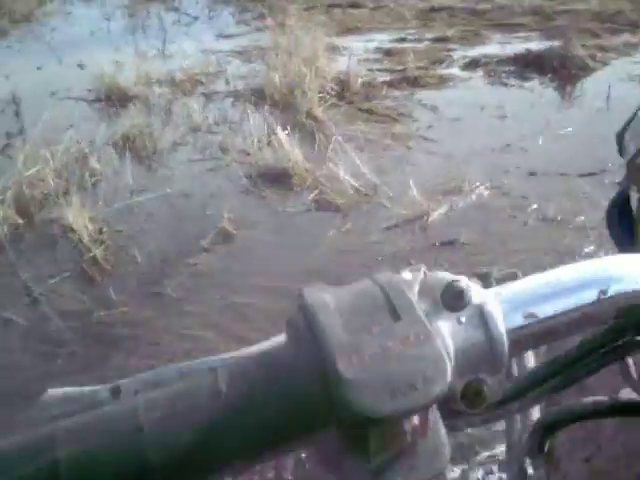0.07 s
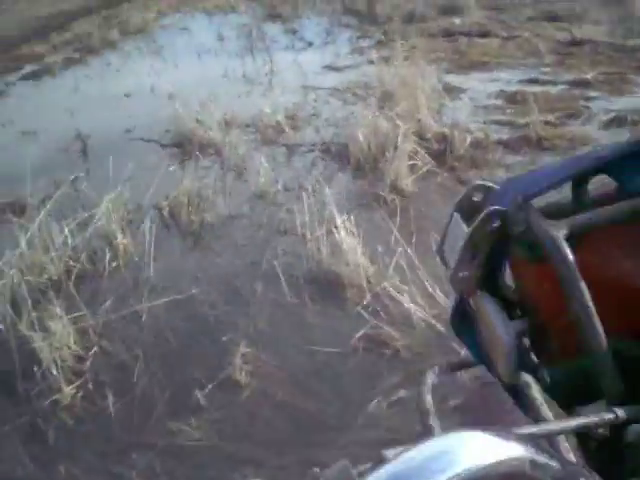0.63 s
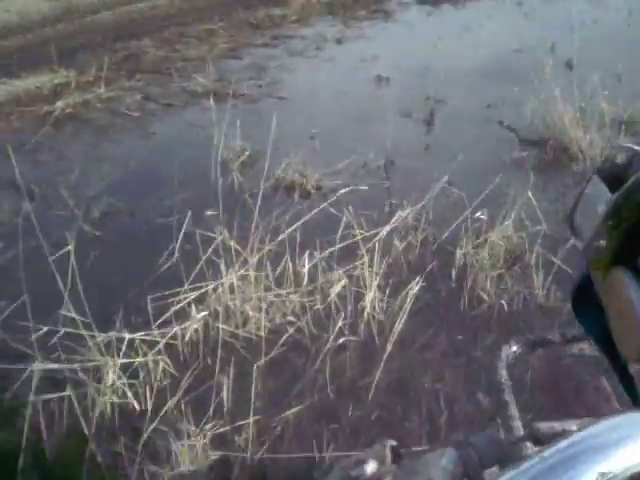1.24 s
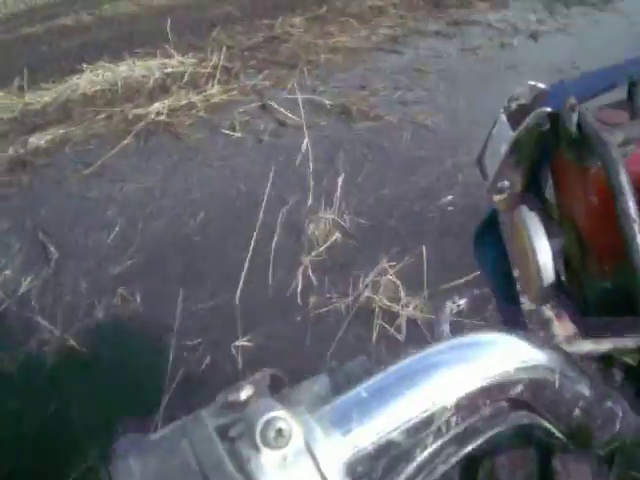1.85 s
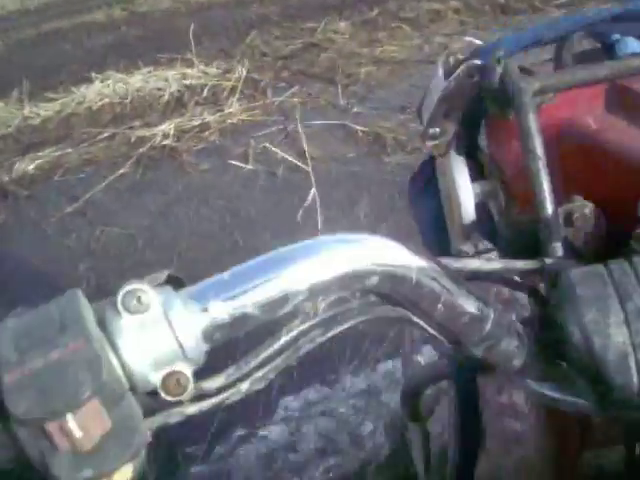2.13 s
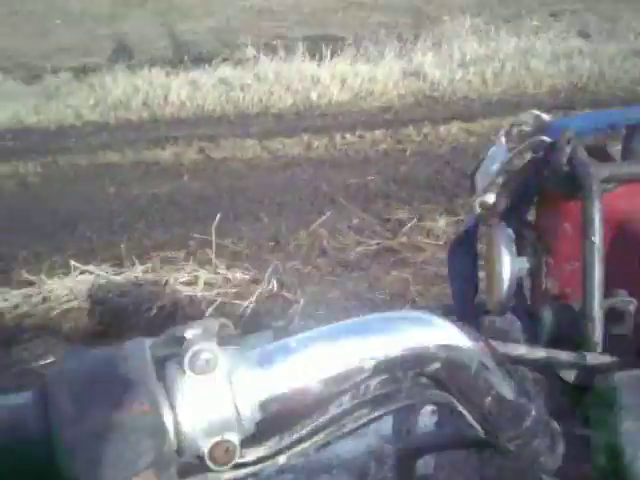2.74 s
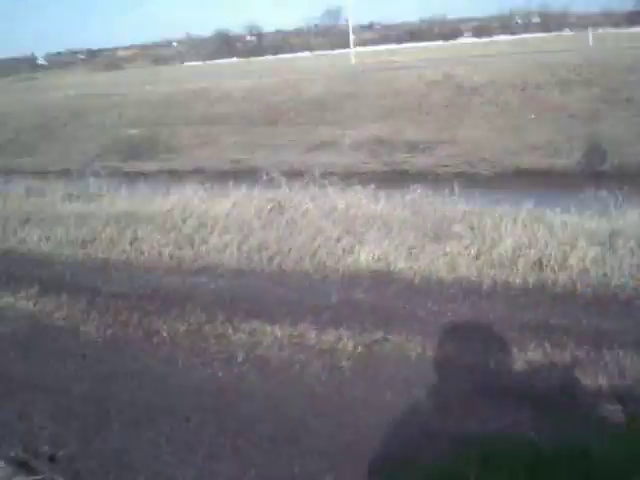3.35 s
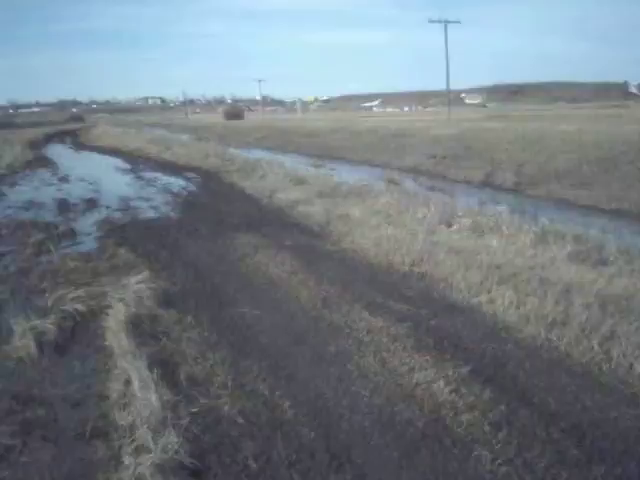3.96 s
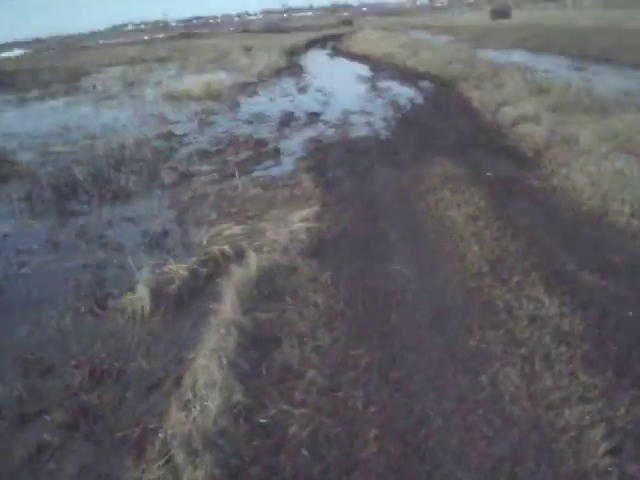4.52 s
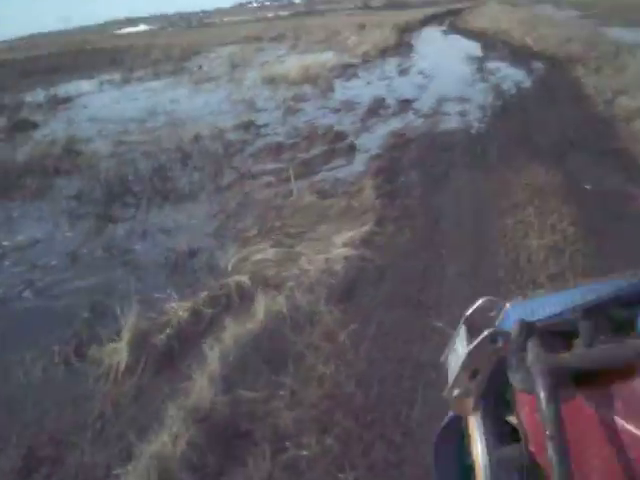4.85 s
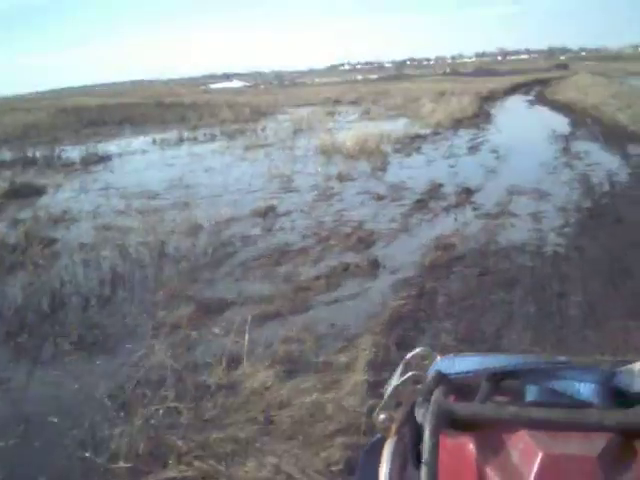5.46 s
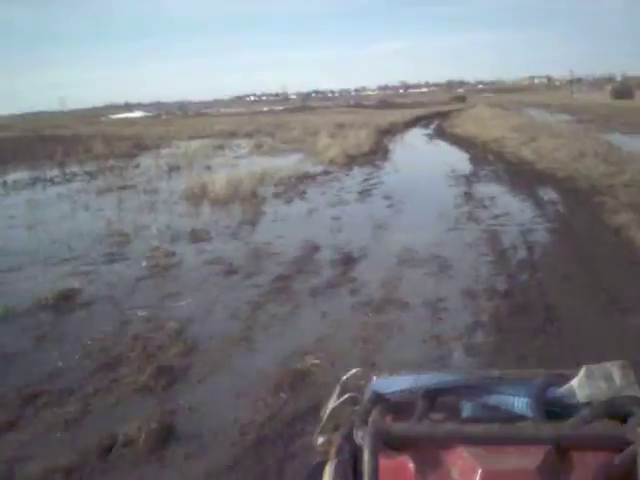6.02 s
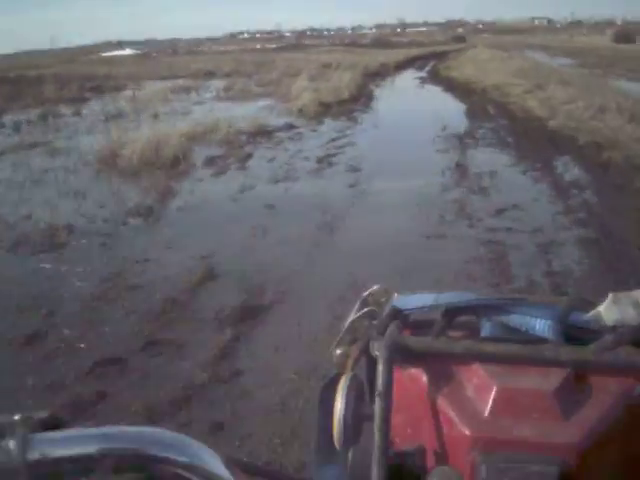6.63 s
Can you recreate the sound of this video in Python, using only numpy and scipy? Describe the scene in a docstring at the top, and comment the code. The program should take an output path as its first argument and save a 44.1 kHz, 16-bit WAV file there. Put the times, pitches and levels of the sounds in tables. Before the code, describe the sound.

Heard from the saddle, an all-terrain vehicle putters along in gusty wind and faint splashing before two bursts of throttle.

```python
"""Quad bike in a flooded field

Heard from the saddle: a four-stroke single chugs along, its intake thudding, its exhaust pulses
ringing silencer and pipe, its casing knocking. Wind buffets the microphone as the bike turns onto
the track; then the throttle is opened twice. Below, water washes round the wheels.
The small microphone hisses and flattens the loudest beats."""
import sys
import numpy as np
from scipy import signal
from scipy.fft import rfft, irfft
from scipy.io import wavfile

SR = 44100
rng = np.random.default_rng(int(sys.argv[2]) if len(sys.argv) > 2 else 0)


def unload_wav(signal):
    """Save mono or channel-first audio to the path in sys.argv[1] as 16-bit WAV at rate SR, clipped to [-1, 1]."""
    wavfile.write(
        sys.argv[1],
        SR,
        np.round(np.clip(np.atleast_2d(signal).T, -1, 1) * 32767).astype(np.int16),
    )


N = 295029
TIME = np.arange(N) / SR

# engine speed: (time [s], firing rate [Hz])
FIRING_RATE = [(0.0, 26.2), (0.3, 26.21), (0.95, 23.53), (1.65, 23.53), (2.2, 26.11), (2.45, 28.6),
               (2.95, 27.56), (3.25, 29.73), (3.62, 26.86), (3.95, 29.4), (4.3, 29.27), (4.8, 39.04),
               (4.97, 41.99), (5.15, 35.21), (5.7, 25.65), (6.1, 30.24), (6.55, 39.39), (6.69, 39.44)]


def engine():
    """The engine under the saddle: all parts follow one crank, which runs a little early or late."""
    jitter_cycles = .006 * wander(rate_hz=15)
    cycles = .12 + np.cumsum(curve(FIRING_RATE)) / SR + jitter_cycles
    return intake(cycles) + exhaust(cycles) + machinery(cycles) + loose_metal(cycles)


def intake(cycles):
    """The piston gulps air once a cycle, just after the exhaust stroke, and the air box thuds."""
    # air box resonances: (frequency [Hz], width [Hz], level [dB])
    air_box = [(61.3, 15, 0), (106.6, 11.7, -0.5)]
    # loudness: (idle [dB], per speed doubling [dB], full throttle [dB], facing forward [dB])
    thud_law = (-32, 8.5, -1.5, 7)
    gulp = stroke(cycles, phase=.31, sharpness=3.2) - .3 * stroke(cycles, phase=.68, sharpness=1.5)
    suction = pulses(cycles, phase=.27, spread_db=2)
    thud = unit_rms(cut(ring(suction, air_box), order=2, edge_hz=200))
    doublings, opening = speed_and_throttle()
    airflow = gain_of(-18.5 + 12.5 * doublings) * opening ** .7  # dies away as the throttle shuts
    return airflow * unit_rms(gulp - gulp.mean()) + part_gain(thud_law) * thud


def exhaust(cycles):
    """Each blowdown booms in the silencer, barks in the pipe and snarls above it, more so on throttle."""
    # resonances of silencer and open pipe: (frequency [Hz], width [Hz], level [dB])
    silencer = [(109.5, 40, -0.5), (145.6, 18, 11)]
    pipe = [(265, 43, -2), (288.4, 79.4, 12), (363.4, 72, -4), (551, 41, -25), (670, 230, -13)]
    # upper exhaust note: (frequency [Hz], level [dB])
    snarl_spectrum = [(150, -36.5), (310, -19.5), (380, 11), (450, 4.5), (520, -3), (620, 2), (760, -7.5),
                      (950, -31.5), (1250, -13.5), (1600, -51), (3000, -44)]
    # loudness: (idle [dB], per speed doubling [dB], full throttle [dB], facing forward [dB])
    boom_law = (-26, 2.5, -3, 2)
    bark_law = (-35, 0.5, 8.5, 6.5)
    snarl_law = (-38, 2.5, 4, 1.5)
    blowdown = unit_rms(pulses(cycles, phase=.97, spread_db=.6))
    # half a cycle on, the idle stroke favours even overtones: the note blooms as one crosses a resonance
    idle_stroke = unit_rms(pulses(cycles, phase=.47, spread_db=.6))
    turbulence = .12 * unit_rms((.4 + stroke(cycles, phase=.2, sharpness=2.5)) * noise())
    drive = blowdown + turbulence
    boom = ring(drive + .41 * idle_stroke, silencer)
    boom = -unit_rms(cut(boom, order=4, edge_hz=175))
    # each pipe mode is passed twice, out and back, so the bark swells instead of striking
    bark = np.zeros(N)
    for hz, width, db in pipe:
        mode = [(hz, width, 0)]
        outward = ring(drive + .33 * idle_stroke, mode)
        bark += gain_of(db) * ring(outward, mode)
    bark = unit_rms(cut(bark, order=4, edge_hz=205, kind="highpass"))
    # gas surges at the same points of every cycle, so the snarl holds clear overtones
    surges = sum(gain_of(db) * pulses(cycles, phase, spread_db=.7)
                 for phase, db in [(.08, 0), (.23, -2), (.44, -4), (.83, -5)])
    snarl = colour(unit_rms(surges) + turbulence, snarl_spectrum)
    return part_gain(boom_law) * boom + part_gain(bark_law) * bark + part_gain(snarl_law) * snarl


def machinery(cycles):
    """Piston and valves knock on the casing; gas and chain add a rattle in step with them."""
    # blows within one engine cycle: (phase [cycles], level [dB])
    knocks = [(.02, 7.5), (0.268, 4.5), (0.519, 0.5), (0.759, 3)]
    # casing resonances: (frequency [Hz], width [Hz], level [dB])
    casing_modes = [(1140, 8.5, 1), (1248, 5.6, 3.5), (1307, 240, -11), (3330, 30, -16.5),
                    (4530, 110, -25.5)]
    # midrange rasp and bright clatter: (frequency [Hz], level [dB])
    rasp_spectrum = [(200, -19.5), (450, 4.5), (680, 6), (830, -7.5), (1000, -1.5), (1300, -1.5),
                     (1480, -6), (1620, -21), (2000, -16.5), (3000, -24), (6000, -56.5)]
    clatter_spectrum = [(300, 1), (1000, 2.5), (1900, 5), (2800, 8), (3100, 5.5), (3400, 4.5), (3900, 3.5),
                        (4550, 3), (4900, 0.5), (5300, -18), (8000, -7), (11000, -3.5), (13000, -30)]
    # loudness: (idle [dB], per speed doubling [dB], full throttle [dB], facing forward [dB])
    rasp_law = (-50, 6.5, 9.5, 2)
    clatter_law = (-55.5, 7, 6.5, -0.5)
    decay_s = .0075
    blows = sum(gain_of(db) * pulses(cycles, phase, spread_db=.5) for phase, db in knocks)
    tails = signal.lfilter([1], [1, -np.exp(-1 / (decay_s * SR))], blows)
    clicks = unit_rms(blows)
    rattle = unit_rms((.91 + tails) * noise())
    rasp = gain_of(6.5) * colour(.75 * clicks + rattle, rasp_spectrum)
    casing = gain_of(-5.5) * ring(.34 * clicks + rattle, casing_modes)
    choppy_rattle = unit_rms((.5 + tails) * noise())
    clatter = colour(.057 * clicks + choppy_rattle, clatter_spectrum)
    return part_gain(rasp_law) * (rasp + casing) + part_gain(clatter_law) * clatter


def loose_metal(cycles):
    """Loose metal on the bike jingles faintly and chatters in fits, in step with the shaking."""
    # fits of chatter: (peak time [s], level [dB], half length [s], ring frequency [Hz])
    fits = [(0.896, -63.5, 0.36, 7460), (1.22, -62, 0.7, 3320), (2.4, -67, 0.53, 7390),
            (2.75, -53.5, 0.075, 4600), (3.1, -68, 0.11, 7390), (3.289, -58, 0.098, 4490),
            (3.716, -60, 0.079, 4600), (4.36, -54.5, 0.058, 4530)]
    # loudness: (idle [dB], per speed doubling [dB], full throttle [dB], facing forward [dB])
    jingle_law = (-68.5, 17, 4, 0.5)
    jingle_hz, metal_q = 4525, 30
    shaking = stroke(cycles, phase=.2, sharpness=.4) * gain_of(3.3 * wander(rate_hz=14)) * noise()
    out = part_gain(jingle_law) * ring(shaking, [(jingle_hz, jingle_hz / metal_q, 0)])
    for peak_s, db, half_s, hz in fits:
        out += gain_of(db) * swell(peak_s, half_s) * ring(shaking, [(hz, hz / metal_q, 0)])
    return out


def speed_and_throttle():
    """Engine speed in doublings above idle, and throttle opening."""
    # the rider's thumb: (time [s], opening [0-1])
    throttle = [(0, 0.31), (.45, 0.53), (.8, 0.3), (1.7, 0.45), (2.45, 0.65), (4.25, 0.24), (4.55, 0.43),
                (4.8, 0.76), (4.92, 0.93), (5.06, 0.26), (5.68, 0), (5.88, 1), (6.6, 0.89), (6.69, 0)]
    idle_hz = 25
    return np.log2(curve(FIRING_RATE) / idle_hz), curve(throttle)


def part_gain(law):
    """Gain of an engine part at the saddle: its idle level, shifted by speed, throttle and mic aim."""
    # the microphone swings from the bike's side to face over the engine: (time [s], forward [0-1])
    aim = [(0, 0), (3.4, 0), (4.9, 1)]
    idle_db, speed_db, throttle_db, forward_db = law
    doublings, opening = speed_and_throttle()
    return gain_of(idle_db + speed_db * doublings + throttle_db * opening + forward_db * curve(aim))


def wind():
    """Wind right on the microphone: a lumpy rumble, and eddies that hit the port in single buffets."""
    # rumble of the air stream: (frequency [Hz], level [dB])
    rumble_spectrum = [(8, 9.5), (25, 7), (55, 3), (130, -2), (280, -5), (450, -15.5), (750, -21.5),
                       (1200, -34), (2000, -42.5), (5000, -59)]
    # its strength: (time [s], level [dB])
    breeze = [(0, -23), (1.05, -23.5), (1.3, -18), (2.6, -23), (3.2, -15.5), (3.8, -13.5), (4.3, -20),
              (4.7, -21), (6.69, -21.5)]
    # faster eddies reach higher: (peak time [s], level [dB], half length [s], upper edge [Hz])
    buffets = [(1.026, -19, 0.0053, 1090), (1.159, -24, .02, 900), (1.227, -23.5, 0.042, 950),
               (1.327, -19.5, 0.015, 830), (1.371, -18, 0.0096, 1100), (1.494, -14.5, 0.0046, 1220),
               (1.643, -22, 0.013, 970), (1.844, -24, 0.027, 685), (1.898, -19, 0.0072, 1060),
               (1.986, -23, 0.014, 1050), (2.3, -24.5, 0.097, 800), (2.649, -19, 0.017, 1000),
               (2.688, -18.5, 0.014, 1660), (2.727, -16.5, 0.008, 1400), (2.853, -18, 0.018, 1390),
               (2.902, -18.5, 0.018, 1110), (2.97, -11, 0.048, 45), (3.037, -21.5, 0.039, 905),
               (3.144, -15, 0.011, 690), (3.197, -14, 0.0037, 905), (3.258, -12.5, 0.027, 800),
               (3.364, -14.5, 0.039, 600), (3.428, -10, 0.024, 120), (3.554, -11.5, 0.03, 663),
               (3.677, -11.5, 0.0071, 780), (3.776, -17, 0.011, 500), (3.863, -17, 0.029, 606),
               (3.91, -11.5, 0.019, 173), (4.004, -15, 0.25, 111), (4.071, -24, 0.0025, 850),
               (4.08, -15, 0.019, 141), (4.189, -13.5, 0.009, 574)]
    # eddy noise: (frequency [Hz], level [dB])
    eddy_spectrum = [(15, 6.5), (60, 3), (200, 5.5), (600, -3.5), (1500, -10.5), (5000, -31)]
    rumble = colour(noise(), rumble_spectrum) * gain_of(2.77 * wander(rate_hz=28.5))
    out = gain_of(curve(breeze)) * unit_rms(rumble)
    eddies = colour(noise(), eddy_spectrum)
    eddies *= gain_of(2.6 * wander(rate_hz=120))  # eddies break into smaller ones
    for peak_s, db, half_s, edge_hz in buffets:
        near = abs(TIME - peak_s) < 3 * half_s
        gust = swell(peak_s, half_s)[near]
        puff = gust * cut(eddies[near], order=3, edge_hz=edge_hz)
        out[near] += gain_of(db) * unit_rms(puff) * np.sqrt(np.mean(gust ** 2))
    return out


def hoot():
    """One strong gust sheds eddies across the port at a falling rate: a short, rough, low whoop."""
    peak_s, sag_hz_per_s = 3.872, 800
    hz = 150 - sag_hz_per_s * (TIME - peak_s) + 20 * wander(rate_hz=90)
    return gain_of(-11) * swell(peak_s, half_s=.022) * np.sin(2 * np.pi * np.cumsum(hz) / SR)


def water():
    """Small splashes crowd round the wheels below the microphone and fade on the muddy track."""
    # splashes: (frequency [Hz], level [dB])
    splash_spectrum = [(60, -13), (250, 0), (600, -26), (1200, -17.5), (1700, -46), (3500, -33.5),
                       (6000, -43)]
    # strength of the wash: (time [s], level [dB])
    wash = [(0, -41.5), (2.5, -38), (4, -43.5), (6.69, -72)]
    drops_per_s = 900
    hits = rng.random(N) < drops_per_s / SR
    sizes = gain_of(4.5 * np.minimum(rng.exponential(1, N), 4))
    drops = hits * sizes * rng.choice([-1, 1], N)
    return gain_of(curve(wash) + .52 * wander(rate_hz=3.4)) * colour(drops, splash_spectrum)


def pulses(cycles, phase, spread_db):
    """One click a cycle at the given phase, no two equally strong."""
    at = np.flatnonzero(np.diff(np.floor(cycles - phase)) > 0)
    out = np.zeros(N)
    out[at] = gain_of(spread_db * noise()[at])
    return out


def stroke(cycles, phase, sharpness):
    """A smooth swell once a cycle."""
    return np.exp(sharpness * (np.cos(2 * np.pi * (cycles - phase)) - 1))


def swell(peak_s, half_s):
    """A bell-shaped rise and fall around a moment."""
    return np.exp(-np.minimum(((TIME - peak_s) / half_s) ** 2 / 2, 50))


def ring(x, modes):
    """A bank of resonances, rms 1 out; neighbouring modes swing in opposite senses."""
    return unit_rms(sum((-1) ** k * gain_of(db) * signal.lfilter(*signal.iirpeak(hz, hz / width, SR), x)
                        for k, (hz, width, db) in enumerate(modes)))


def colour(x, spectrum):
    """Minimum-phase filter with the given spectral shape, rms 1 out."""
    hz, db = np.transpose(spectrum)
    grid_hz = np.fft.rfftfreq(16384, 1 / SR) + 1
    log_gain = np.log(gain_of(np.interp(np.log(grid_hz), np.log(hz), db)))
    mirrored = np.concatenate([log_gain, log_gain[-2:0:-1]])
    response = np.exp(np.conj(signal.hilbert(mirrored)))
    taps = np.fft.ifft(response).real[:len(mirrored) // 2]
    return unit_rms(signal.oaconvolve(x, taps)[:N])


def cut(x, order, edge_hz, kind="lowpass"):
    """Rolls off one side of the spectrum."""
    return signal.lfilter(*signal.butter(order, edge_hz, kind, fs=SR), x)


def wander(rate_hz):
    """Smooth random drift of rms 1."""
    hz = np.fft.rfftfreq(N, 1 / SR)
    return unit_rms(irfft(rfft(noise()) * np.exp(-(hz / rate_hz) ** 2), N))


def noise():
    """White noise."""
    return rng.standard_normal(N)


def curve(rows):
    """Joins (time [s], value) points by straight lines."""
    return np.interp(TIME, *np.transpose(rows))


def gain_of(db):
    """Decibels to a factor."""
    return 10 ** (np.asarray(db) / 20)


def unit_rms(x):
    """Scales to an rms of 1."""
    return x / np.sqrt(np.mean(x ** 2) + 1e-20)


def scene():
    """Engine, wind and water from the saddle, in mono."""
    return (engine() + wind() + hoot() + water())[None]


def record(dry):
    """The small microphone's preamplifier flattens the peaks and hisses; the top treble is cut off."""
    # self-noise: (frequency [Hz], level [dB])
    hiss_spectrum = [(100, 1), (3000, -3), (5500, 0.5), (7200, 0), (7390, 4), (7600, -1), (9500, -1),
                     (10500, 3), (11500, -1), (12300, -23), (13000, -32)]
    ceiling, edge_hz = .62, 12800
    flattened = dry[0] / (1 + (dry[0] / ceiling) ** 8) ** (1 / 8)
    hiss = gain_of(-56.5) * colour(noise(), hiss_spectrum)
    band_limit = signal.firwin(511, edge_hz, window=("kaiser", 9), fs=SR)
    return signal.oaconvolve(flattened + hiss, band_limit, "same")[None]


dry = scene()
out = record(dry)
unload_wav(out)
```